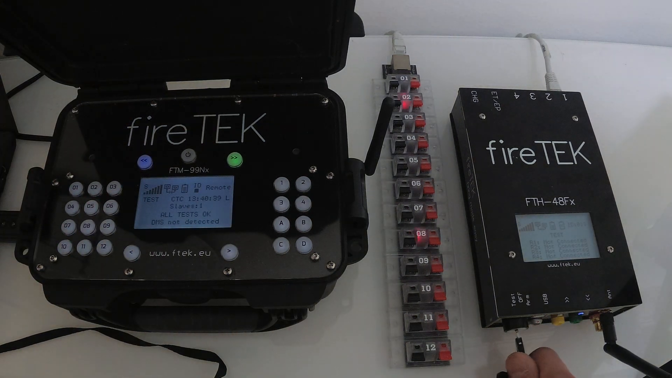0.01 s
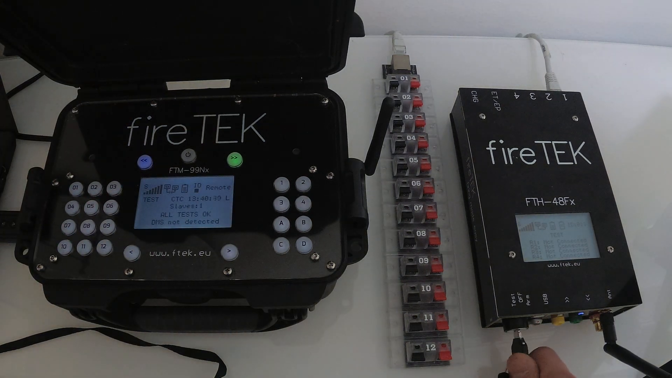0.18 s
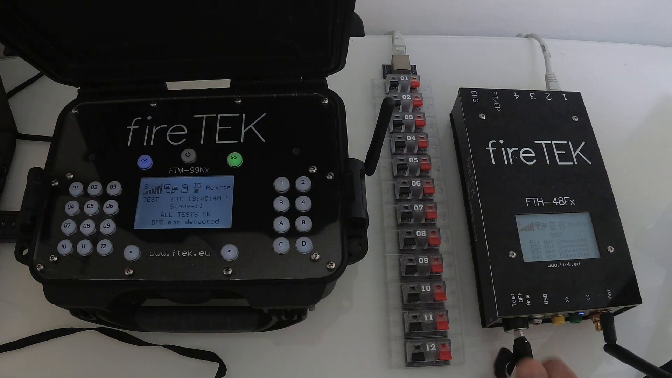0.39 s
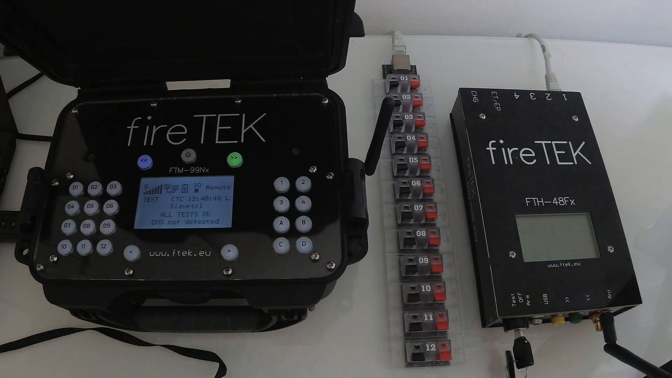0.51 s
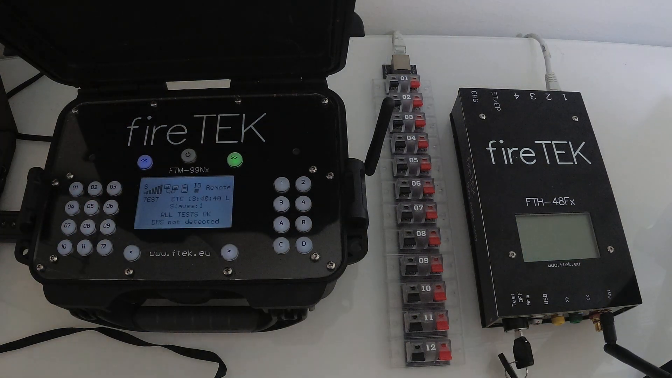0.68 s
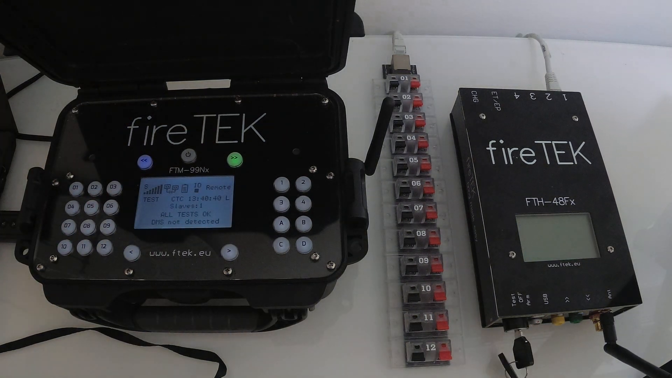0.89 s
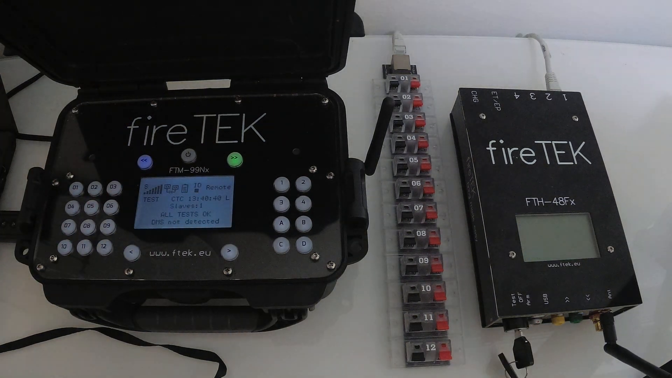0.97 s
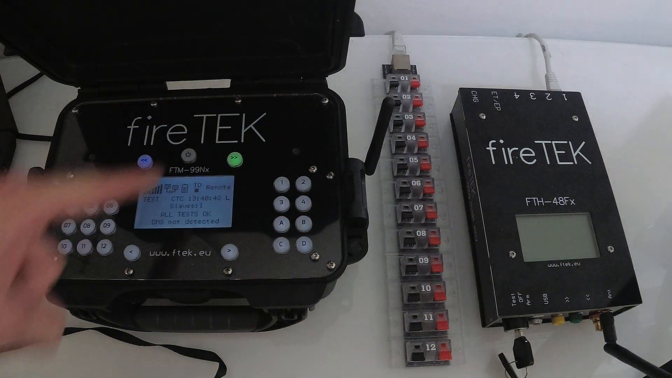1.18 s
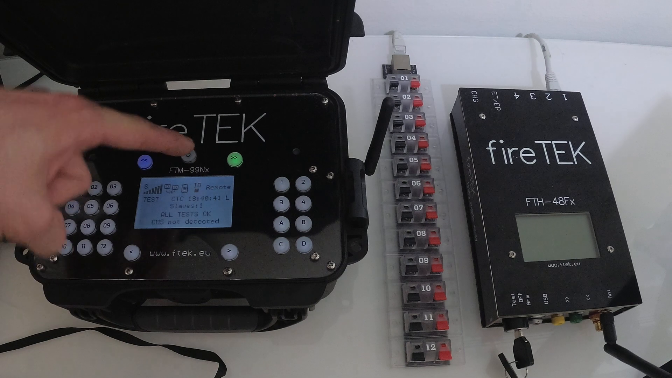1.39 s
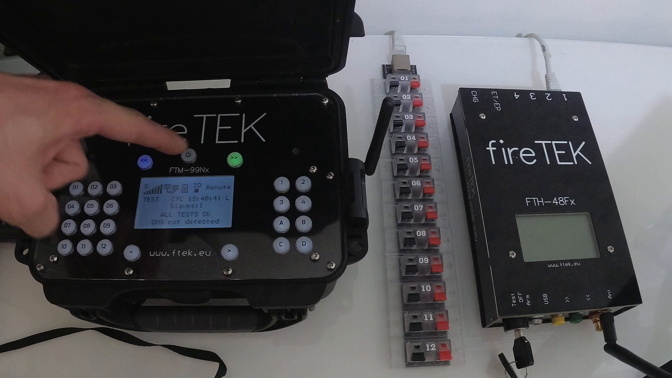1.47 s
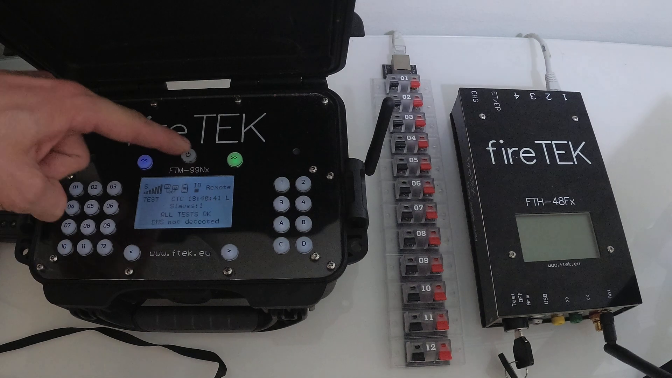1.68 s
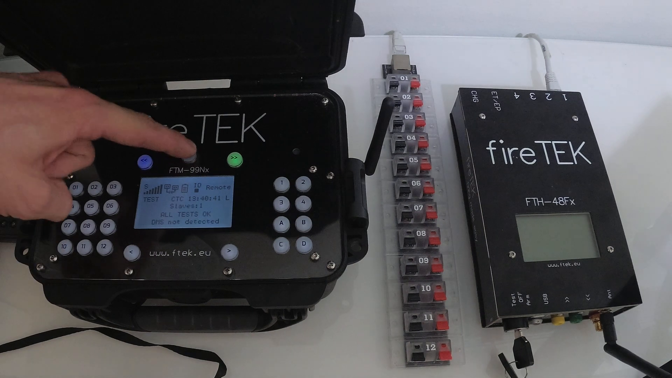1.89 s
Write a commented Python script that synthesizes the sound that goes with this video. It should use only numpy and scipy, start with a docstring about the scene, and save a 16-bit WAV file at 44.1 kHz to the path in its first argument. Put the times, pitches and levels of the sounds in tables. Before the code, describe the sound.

A key switch on an electronic controller ticks at the start, snaps sharply with a small thud at about 0.2 seconds and gives a lighter after-click at 0.3, ringing briefly in a small room. From 0.4 to 1.5 seconds a hand moves across with faint sleeve rustle and soft, dull bumps, lightly touching a plastic button near the end. A faint steady electrical hum and hiss lie underneath.

```python
"""Small switch snapping over

On a table in a small room, the switch of an electronic controller ticks, snaps sharply with a thud and
gives an after-click: each contact is a crack of noise that rings the switch and its case. A hand then
moves across with a faint sleeve rustle and soft bumps and touches a plastic button, all shaped noise.
An electrical hum and hiss lie beneath."""
import sys
import numpy as np
from scipy import signal
from scipy.fft import rfft, irfft
from scipy.io import wavfile

SR = 44100
rng = np.random.default_rng(int(sys.argv[2]) if len(sys.argv) > 2 else 0)


def to_wav(sig):
    """Store sig (one row per channel, or 1-D mono) as 16-bit WAV at the path in sys.argv[1].

    Samples outside -1..1 are clipped; the rate is SR.
    """
    pcm = np.clip(np.atleast_2d(sig), -1, 1) * 32767
    pcm = np.round(pcm).astype(np.int16)
    wavfile.write(sys.argv[1], SR, pcm.T)  # frames by channels


N = 83790
T = np.arange(N) / SR
HZ = np.maximum(np.fft.rfftfreq(N, 1 / SR), 1)


def from_db(db):
    """Decibels to gain."""
    return 10 ** (np.asarray(db) / 20)


def unit_rms(x):
    """Scale to rms 1."""
    return x / np.sqrt(np.mean(x ** 2) + 1e-20)


def at_hz(curve, hz=HZ):
    """Read a curve on a log-frequency axis."""
    freqs, values = np.transpose(curve)
    return np.interp(np.log(hz), np.log(freqs), values)


def pan(db):
    """Stereo gains for a left-minus-right level difference."""
    return from_db(np.array([[.5], [-.5]]) * db)


def decay(t60):
    """Exponential fade, 60 dB down after t60 seconds."""
    return np.exp(-np.log(1000) * T / t60)


def delayed(x, seconds):
    """Start a stereo sound later."""
    return np.pad(x, ((0, 0), (int(seconds * SR), 0)))[:, :N]


def lowpass(x, hz):
    """Dull the top, 24 dB per octave."""
    return signal.sosfilt(signal.butter(4, hz, fs=SR, output="sos"), x + 1e-18)


def highpass(x, hz):
    """Thin the bass, 12 dB per octave."""
    return signal.sosfilt(signal.butter(2, hz, "high", fs=SR, output="sos"), x + 1e-18)


def drift(hz):
    """Random wander of rms 1, mostly slower than hz."""
    return unit_rms(irfft(rfft(rng.standard_normal(N)) / (1 + (HZ / hz) ** 2), N))


def swell(middle_s, half_s):
    """Bell-shaped fade in and out."""
    return np.exp(-.5 * ((T - middle_s) / half_s) ** 2)


# Stereo image of the noise: (frequency [Hz], left-right correlation [0..1])
CORRELATION = [(100, 0.47), (400, 0.58), (900, 0.6), (2000, 0.083), (5000, 0.033), (15000, .05)]

def noise(spectrum, pan_db=0):
    """Coloured stereo noise of rms 1, narrower in the bass and wide in the treble."""
    mid, side = rfft(rng.standard_normal((2, N)))
    alike = at_hz(CORRELATION)
    stereo = np.sqrt(1 + alike) * mid + np.sqrt(1 - alike) * side * [[1], [-1]]
    return unit_rms(irfft(stereo * from_db(at_hz(spectrum)) * pan(pan_db), N))


# Colour of the room tone: (frequency [Hz], relative level [dB])
ROOM_TONE_EQ = [(20, -43), (32, -33), (50, -13.5), (90, -18.5), (125, -15.5), (160, -8.5), (205, -4.5),
                (270, -9.5), (345, -6.5), (400, -12), (620, -14), (760, -19), (1190, -17.5), (1700, -21.5),
                (4000, -22.5), (16000, -24)]
# Its lean to either side: (frequency [Hz], pan L-R [dB])
ROOM_TONE_PAN = [(200, 1), (700, 3), (1300, 2), (2400, -1), (5000, 0), (15000, 0)]

def room_tone():
    """A steady bed of low room noise and hiss."""
    return from_db(-59) * noise(ROOM_TONE_EQ, at_hz(ROOM_TONE_PAN))


# Tones of the electrical hum: (frequency [Hz], rms level [dB])
HUM_TONES = [(98.3, -77.5), (147.5, -68.5), (344.3, -68), (639.5, -71.5), (15703, -77)]

def hum(waver_db=.8, wander_rad=.25):
    """Running equipment hums, each tone wavering slightly in level and phase."""
    out = 0
    for hz, db in HUM_TONES:
        amplitude = np.sqrt(2) * from_db(db + waver_db * drift(hz=4))
        out += amplitude * np.sin(2 * np.pi * hz * T + wander_rad * drift(hz=4))
    return out


# Decay of the small room: (frequency [Hz], t60 [s])
REVERB_TIMES = [(200, 0.66), (1000, 0.52), (2500, 0.39), (5000, 0.43), (9000, 0.34), (15000, 0.21)]

def room_tail(spectrum, pan_db=0, build_s=0.002):
    """Diffuse reverb of one hit: builds up, then dies band by band."""
    wash = rfft(noise(spectrum, pan_db))
    centres, t60s = np.transpose(REVERB_TIMES)
    tail = 0
    for solo, t60 in zip(np.eye(len(centres)), t60s):
        band = at_hz(list(zip(centres, solo)))
        tail += irfft(wash * band, N) * decay(t60)
    return tail * (1 - np.exp(-T / build_s))


# Sleeve rustles: (middle [s], half length [s], level [dB], high cut [Hz])
SLEEVE_MOVES = [(0.053, 0.053, -69, 1610), (0.696, 0.043, -60, 1890), (1.105, 0.031, -62.5, 1200),
                (1.205, 0.073, -62.5, 1067)]
# Colours of cloth and of sliding skin: (frequency [Hz], relative level [dB])
CLOTH_EQ = [(300, 0), (600, 10), (800, 9.5), (1200, 11), (2000, -3), (4000, 23.5)]
SKIN_EQ = [(1000, 6), (3000, -4.5), (5000, -3), (9000, -6), (15000, -10)]
HAND_PAN_DB = 5  # to the left

def sleeve():
    """Cloth rustles as the arm moves; skin hisses faintly as the hand draws away."""
    cloth = 0
    for middle_s, half_s, db, top_hz in SLEEVE_MOVES:
        rustle = unit_rms(lowpass(noise(CLOTH_EQ), top_hz))
        cloth += from_db(db) * swell(middle_s, half_s) * rustle
    skin = from_db(-64) * swell(middle_s=0.75, half_s=0.11) * noise(SKIN_EQ)
    return cloth * pan(HAND_PAN_DB) + skin


# Touches of the hand: (time [s], gain [dB], high cut [Hz], low cut [Hz], t60 [s])
TOUCHES = [(0.428, -58, 1000, 413, 0.29), (0.521, -52, 2730, 800, 0.17), (0.722, -51.5, 1900, 805, 0.085),
           (0.961, -52.5, 900, 217, 0.063), (1.208, -53, 1051, 600, 0.035), (1.311, -51, 6050, 1180, 0.023),
           (1.450, -48.5, 830, 554, 0.031)]
# Colour of a touch: (frequency [Hz], relative level [dB])
TOUCH_EQ = [(100, -5), (200, -1), (350, 9), (700, 4), (1500, 1), (3000, -6)]

def hand_bumps(attack_s=0.00078, reverb_db=-20.5):
    """The hand meets table, case and button in soft, dull bursts."""
    out = 0
    for start, db, top_hz, low_hz, t60 in TOUCHES:
        hit = noise(TOUCH_EQ) * decay(t60) * (1 - np.exp(-T / attack_s))
        hit += from_db(reverb_db) * room_tail(TOUCH_EQ)
        muffled = highpass(lowpass(hit, top_hz), low_hz)
        makeup = np.sqrt(SR / 4 / top_hz)  # duller bumps get more gain
        out += from_db(db) * makeup * delayed(muffled, start)
    return out * pan(HAND_PAN_DB)


# Low body under the hits: (time [s], pitch [Hz], peak level [dB], rise [s])
CASE_THUDS = [(0.0005, 309.4, -47, 0.013), (0.227, 197, -46, 0.0099), (0.734, 213.3, -60.5, 0.012)]

def thuds():
    """Case and table swell and die at one low pitch per hit, dead centre."""
    out = 0
    for start, hz, db, rise_s in CASE_THUDS:
        envelope = T / rise_s * np.exp(1 - T / rise_s)
        thud = from_db(db) * envelope * np.sin(2 * np.pi * hz * T)
        out += delayed(thud * pan(0), start)
    return out


# Resonances of switch and case: (frequency [Hz], level [dB], t60 [s], pan L-R [dB])
CASE_MODES = [(605.4, -40.5, 0.077, 13.5), (830, -44, 0.034, 10), (1410, -42, 0.033, -1.5),
              (2723, -33.5, 0.031, -4.5), (3990, -27, 0.02, 2), (4900, -18.5, .018, -2.5),
              (5260, -22.5, 0.012, 7), (6860, -27, 0.015, 9), (8206, -20.5, 0.0091, -5.5),
              (8960, -16, 0.013, 8.5), (14740, -19.5, 0.012, -2), (15100, -29, .014, 6),
              (4930, -51, 0.4, 1), (5610, -55, .33, 0), (9050, -50, 0.32, -4), (10060, -36, 0.035, -2)]

def case_ring(left_lag_s=0.00015):
    """Switch and case ring as damped sines of alternating polarity."""
    left, right = sum((-1) ** k * from_db(db) * pan(pan_db) * decay(t60) * np.sin(2 * np.pi * hz * T)
                      for k, (hz, db, t60, pan_db) in enumerate(CASE_MODES))
    return np.array([np.interp(T - left_lag_s, T, left), right])  # the switch sits to the right


def tilted(x, db):
    """Lift the highs above 4 kHz by db and lower the lows by twice that."""
    lows = signal.lfilter(*signal.butter(1, 4000, fs=SR), x + 1e-18)
    return lows * from_db(-2 * db) + (x - lows) * from_db(db)


def struck_spot(x, hz, db, width_hz=380):
    """The spot that is struck boosts or dips one narrow band."""
    band = signal.lfilter(*signal.iirpeak(hz, hz / width_hz, fs=SR), x + 1e-18)
    return x + (from_db(db) - 1) * band


# Contacts of tick, snap and after-click:
# (time [s], gain [dB], tilt [dB], pan L-R [dB], ring [dB], room send [dB], spot [Hz], spot gain [dB])
CONTACTS = [(0.0005, -24, -7, 0, -4.5, 4, 1220, 13.5), (0.0032, -13, -4, -9.5, -31, 1, 9300, -1),
            (0.1995, -17, -1, -7, -9, -5, 10250, 18), (0.2265, -2.5, 3.5, -9.5, 2, 5.5, 5250, 6),
            (0.2274, -2.5, 1, 10.5, -2.5, -5.5, 8170, 12), (0.2283, 0, -2, 1, -4, -0.5, 8540, -6),
            (0.3026, -18.5, -3, -7.5, 3, 6.5, 2740, 8), (0.3040, -13, 5, -3, -2, 1, 5330, 7),
            (0.3055, -18.5, -1.5, 6, 2, 0, 10000, 16), (0.3199, -41.5, -8, -17, 3, 11.5, 5200, 3),
            (0.3865, -34, 10, 4, -8.5, 3, 14900, 7)]
# Colours of the dry crack and of its reverb: (frequency [Hz], relative level [dB])
CRACK_EQ = [(200, -13), (700, -7), (2000, -8), (3800, -2), (5000, -7.5), (6300, -1.5), (8500, -5.5),
            (10200, -0.5), (11000, -4), (13000, -8.5), (14700, -6), (16000, 2.5)]
REVERB_EQ = [(150, -14), (300, -1.5), (700, -2.5), (1300, -1), (2000, 0), (3300, -0.5), (4400, 2),
             (5000, 2.5), (6100, -1), (7500, -3), (9000, 7.5), (10200, 2.5), (11000, -3.5), (13000, -5),
             (15000, 4), (16000, -7)]
# Lean of that reverb: (frequency [Hz], pan L-R [dB])
REVERB_PAN = [(200, -1), (700, 1.5), (1300, 3), (2400, -3.5), (15000, -2.5)]

def switch(crack_db=-16, echo_db=-17.5, reverb_db=-36):
    """Each contact cracks, rings the case, bounces off the nearest wall and fills the room."""
    ring = case_ring()
    out = 0
    for start, db, tilt_db, pan_db, ring_db, send_db, spot_hz, spot_db in CONTACTS:
        crack = from_db(crack_db) * noise(CRACK_EQ) * decay(t60=.013)
        direct = (crack + from_db(ring_db) * ring) * pan(pan_db)
        wall_echo = from_db(echo_db) * delayed(direct, seconds=.0102)
        reverb = from_db(reverb_db) * room_tail(REVERB_EQ, at_hz(REVERB_PAN))
        click = direct + from_db(send_db) * (wall_echo + reverb)
        click = struck_spot(tilted(click, tilt_db), spot_hz, spot_db)
        out += from_db(db) * delayed(click, start)
    return highpass(out, hz=200)


def scene():
    """Switch and hand over hum and room tone."""
    return switch() + thuds() + hand_bumps() + sleeve() + hum() + room_tone()


def record(dry):
    """A steep high cut at 15.85 kHz on the whole mix."""
    return signal.sosfilt(signal.ellip(10, .1, 80, 15850, fs=SR, output="sos"), dry)


dry = scene()
out = record(dry)
to_wav(out)
```